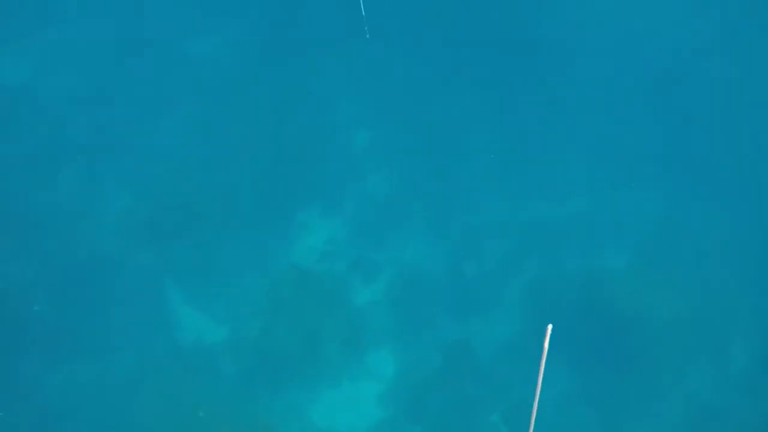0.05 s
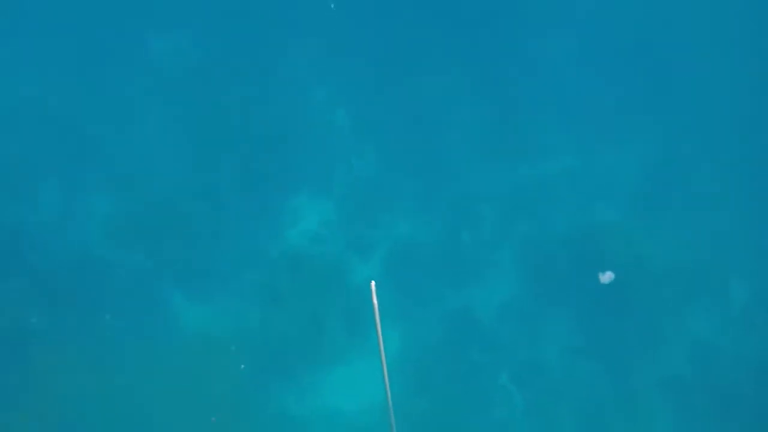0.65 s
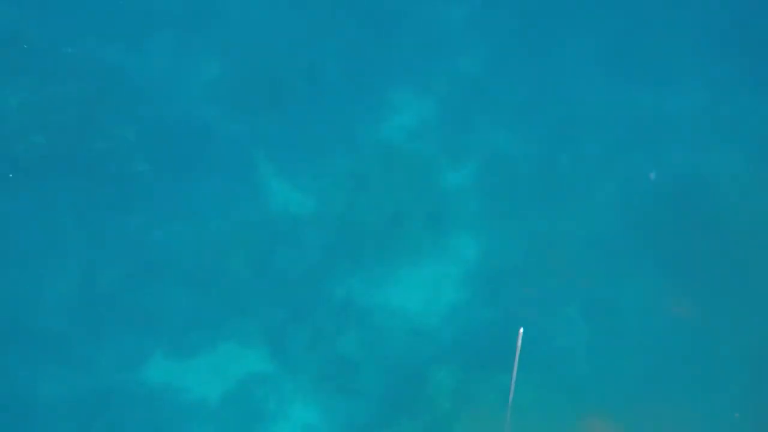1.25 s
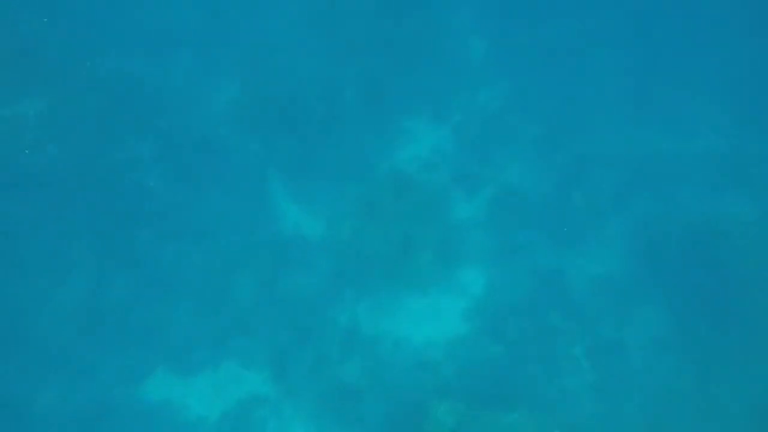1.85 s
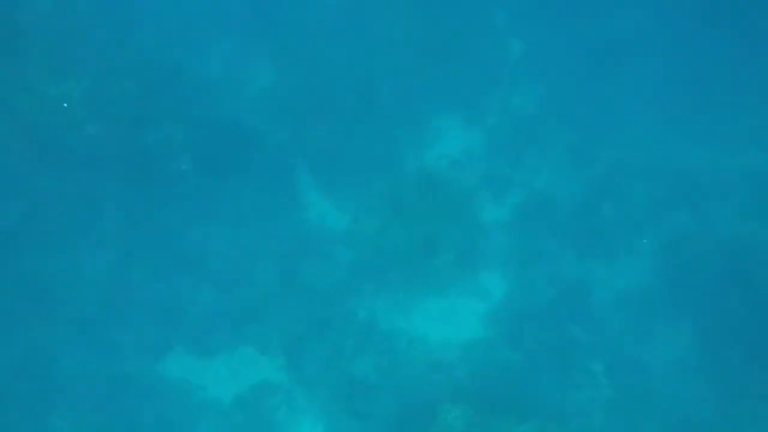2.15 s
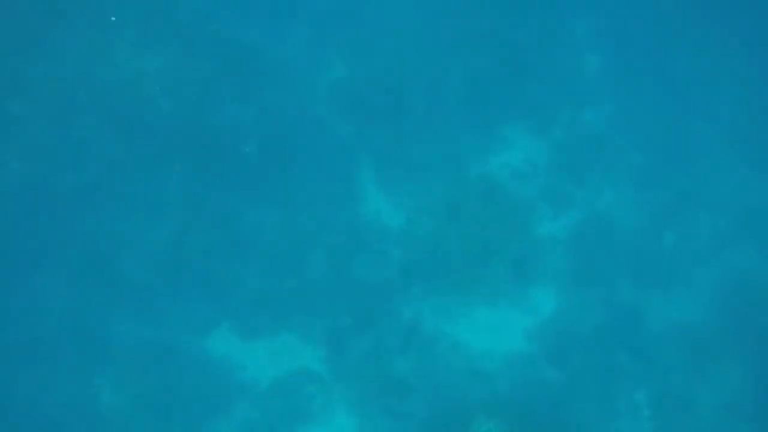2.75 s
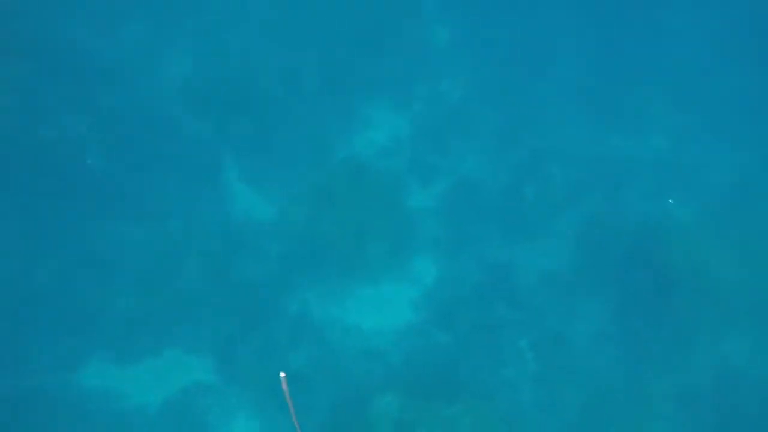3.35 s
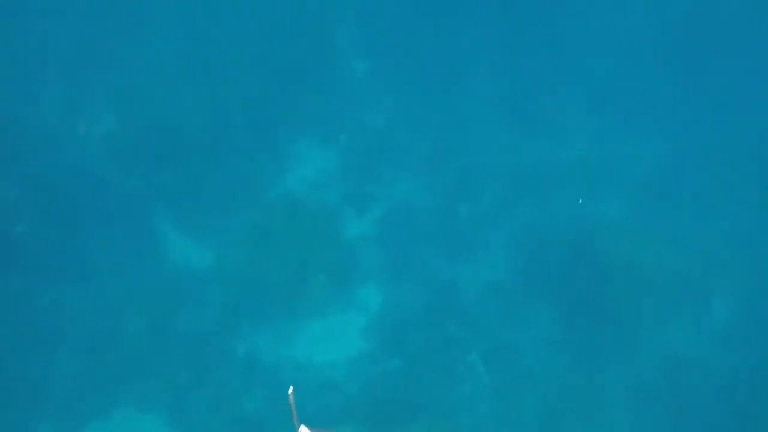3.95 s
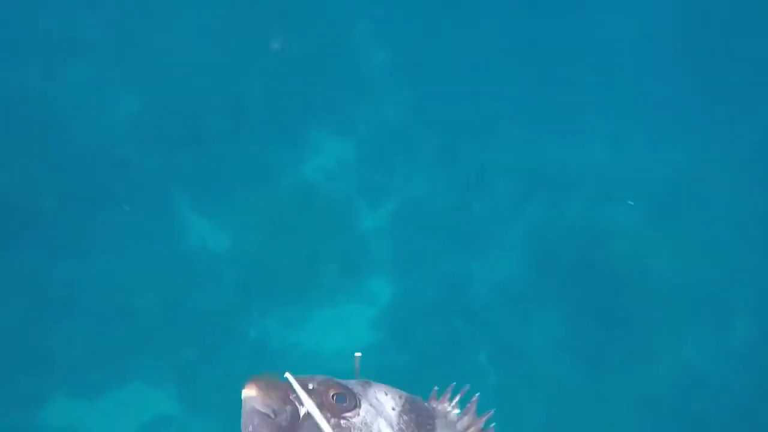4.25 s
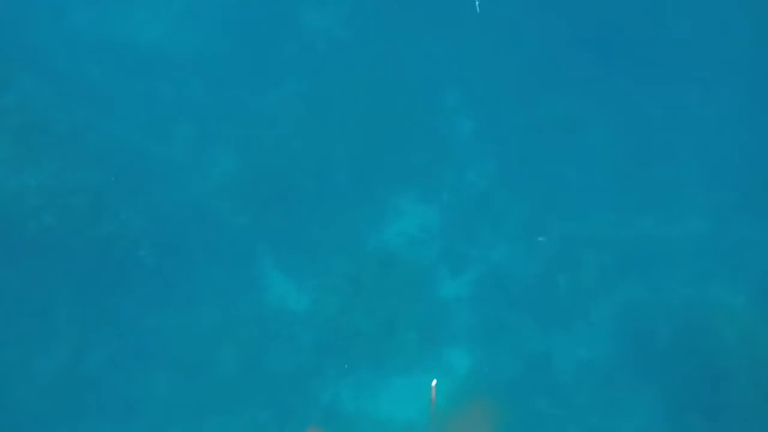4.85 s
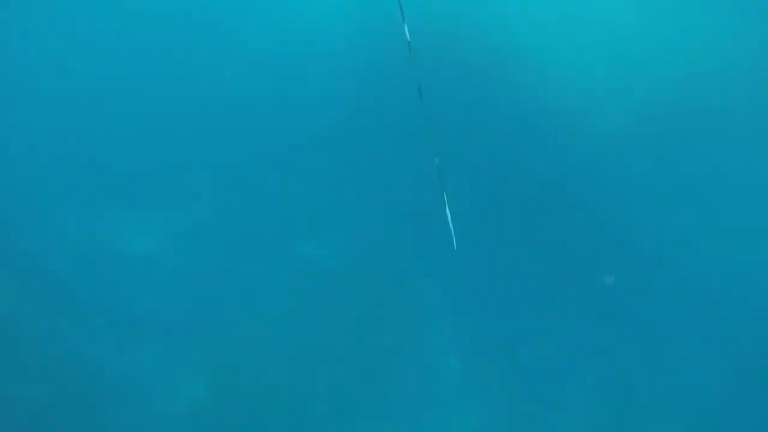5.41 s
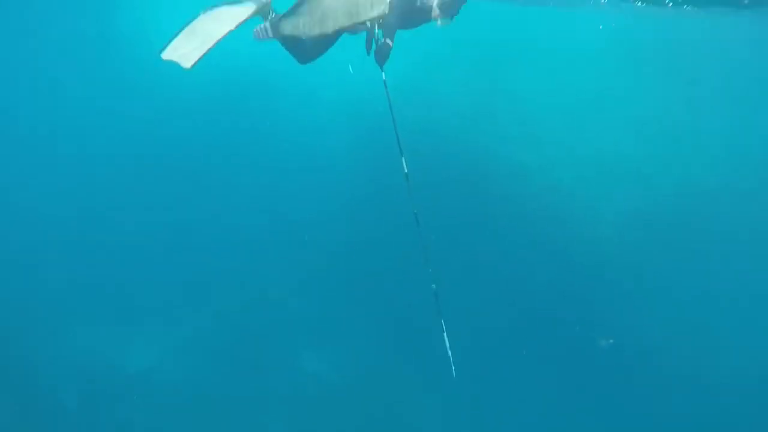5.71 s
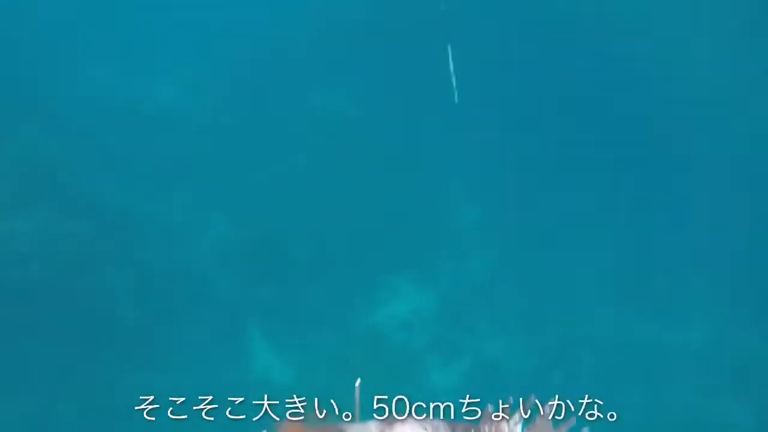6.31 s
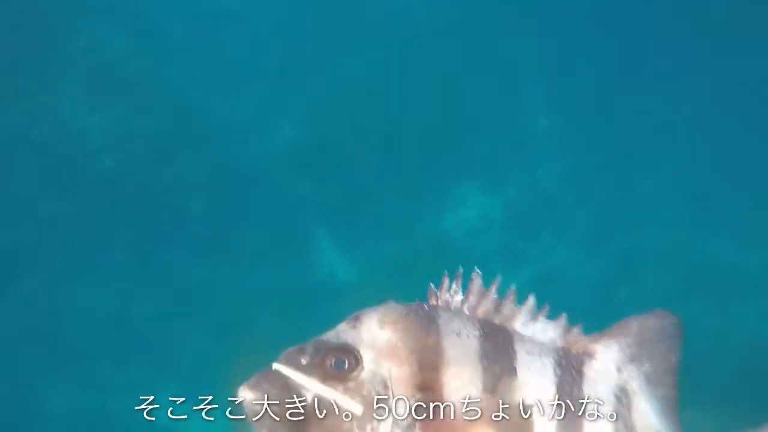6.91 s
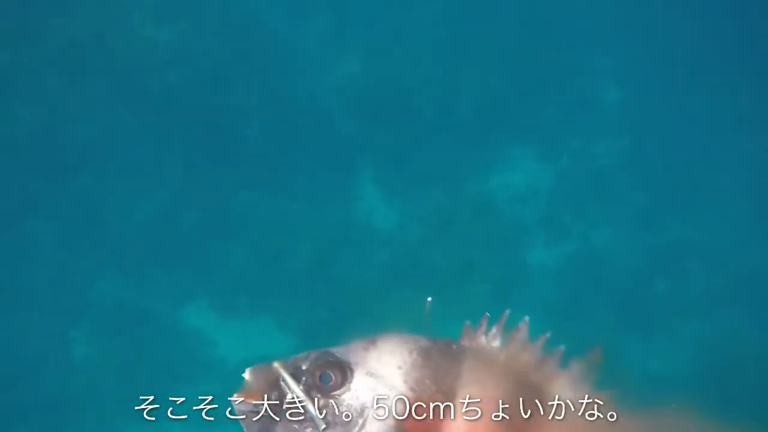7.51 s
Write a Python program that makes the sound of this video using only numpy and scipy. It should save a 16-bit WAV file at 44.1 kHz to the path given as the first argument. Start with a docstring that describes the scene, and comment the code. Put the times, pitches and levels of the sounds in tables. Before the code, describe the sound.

Snapping shrimp fizz and tick throughout this underwater sound, picked up by a housed camera moving through the sea. Eddies make the housing boom, with a few plops and then a thudding swell. From the middle, diving gear rubs in short gritty strokes, with close knocks and ringing bubbles. Near the end come heavier surges, a loud cluster of clacks and plops, and one last scuff as the rumble eases.

```python
"""A diver's camera moves through open sea. From the start, eddies buffet its housing and make it boom,
while snapping shrimp crackle all around. At 0.6 s water plops and bubbles ring; near 2 s comes a surge
with knocks. From 3 s gear rubs over the housing in strokes, among more knocks, bubbles and sharp ticks.
From 5 s stronger surges and gurgling plops lead to the loudest clicks, at 6.1 s, which a limiter holds.
A last stroke scuffs and booms, and after 7 s the water calms while the shrimp crackle on."""
import sys
import numpy as np
from scipy import signal
from scipy.fft import rfft, irfft, next_fast_len
from scipy.io import wavfile
from scipy.ndimage import uniform_filter1d, minimum_filter1d, map_coordinates

SR = 44100
rng = np.random.default_rng(int(sys.argv[2]) if len(sys.argv) > 2 else 0)


def dump(signal):
    """Clip the signal to [-1, 1] and save it as 16-bit WAV at the path in sys.argv[1]."""
    limited = np.clip(np.atleast_2d(signal).T, -1, 1)
    pcm = np.round(limited * 32767).astype(np.int16)
    wavfile.write(sys.argv[1], SR, pcm)


N = 333837

# Levels in the tables are relative: a source may add its own gain.
# slow course of the water's buffeting and of the housing's boom: time_s, level_db
BUFFET_LEVELS = [(0.0, -39.5), (1.1, -37), (1.94, -32), (2.23, -24.5), (2.49, -33.5), (2.78, -37),
                 (3.35, -29.5), (3.8, -28.5), (4.17, -25), (5.74, -31), (6.92, -26.5), (7.12, -32.5),
                 (7.44, -39)]
BOOM_LEVELS = [(0.0, -34), (0.6, -43), (1.28, -37), (1.92, -40.5), (2.15, -31.5), (2.65, -43.5),
               (3.37, -34), (3.98, -38), (4.6, -34.5), (5.27, -50.5), (6.62, -40), (6.77, -28),
               (7.57, -45.5)]
# surges of water as the camera swings: start_s, level_db
SURGES = [(2.07, -31), (4.984, -17.5), (5.601, -22), (6.12, -13.5), (6.63, -24.5)]
# soft shoves against the housing: start_s, level_db, pitch_hz
SHOVES = [(0.553, -21.5, 80), (1.527, -20.5, 171), (2.073, -9.5, 157), (2.092, -13, 54.7),
          (2.155, -10.5, 40.2), (3.369, -20.5, 126), (3.817, -17.5, 42), (4.143, -13.5, 132),
          (4.227, -12.5, 125), (4.261, -11.5, 130), (5.171, -12, 48.2), (5.239, -9, 36.1), (5.611, -17, 91),
          (6.082, -14.5, 99), (6.143, -9, 76), (6.179, -10.5, 124.4), (6.313, -13, 125), (6.632, -13, 132),
          (6.69, -9.5, 133), (6.748, -8.5, 113), (6.799, -11.5, 157), (7.059, -16, 135)]
# knocks on the housing: start_s, thud_db, ring_db
KNOCKS = [(0.572, -32, -14), (2.079, -27, -11.5), (2.099, -28.5, -10), (3.13, -34.5, -15),
          (3.315, -32, -17), (4.23, -29, -17), (4.7135, -17, 3.5), (4.899, -19.5, -7.5), (6.091, -33, 0),
          (6.256, -31.5, -11)]
# modes of the housing: pitch_hz, level_db, t60_s
HOUSING_MODES = [(198.2, -6, 0.15), (317, -12, 0.058)]
# slaps of water: start_s, level_db, start_pitch_hz, gurgle_db
PLOPS = [(0.56, -21.5, 2000, -22.5), (0.573, -14, 905, -26), (0.866, -21, 704, -31),
         (0.888, -16, 2000, -33), (5.016, -19, 1200, -28), (5.241, -17, 1100, -31), (5.985, -21, 2000, -36),
         (6.1429, -1, 2370, -17), (6.364, -21, 1110, -21.5), (6.562, -20.5, 1310, -21.5),
         (7.042, -15.5, 1860, -15.5)]
# short pitched clicks (clacks, the bright tops of snaps, a gurgle's onset): start_s, level_db, centre_hz
CLICKS = [(0.559, -19.5, 7600), (3.887, -22, 11700), (5.3707, -24.5, 11000), (6.089, -13, 3070),
          (6.09, -3.5, 8200), (6.1421, -5.5, 2720), (6.1425, 0.5, 997), (7.049, -19.5, 1280)]
# strokes of gear over the housing: start_s, length_s, scuff_db, grit_db, fizz_db
STROKES = [(2.068, 0.05, -36.5, -29, -36.5), (3.157, 0.35, -47.5, -52, -55.5),
           (3.837, 0.12, -75, -51, -45.5), (4.078, 0.37, -51, -46, -52.5), (4.458, 0.36, -48, -50.5, -50.5),
           (5.422, 0.051, -79, -50, -37.5), (5.798, 0.675, -49.5, -84, -82),
           (6.199, 0.14, -52.5, -41.5, -41.5), (6.609, 0.33, -39.5, -48, -55)]
# catches of sliding gear: start_s, level_db
CATCHES = [(3.368, -26), (3.388, -22), (3.424, -25.5), (3.82, -26.5), (4.087, -28.5), (4.143, -25.5),
           (4.242, -22), (6.089, -11.5), (6.66, -24.5), (6.817, -14), (6.851, -30), (7.108, -27),
           (7.513, -28.5)]
# free bubbles and trapped air pockets: start_s, level_db, pitch_hz, t60_s, glide_octaves_per_s
BUBBLES = [(0.342, -24, 1496, 0.052, -8), (.345, -25.5, 2140, 0.038, -1), (0.536, -26, 1574, 0.048, -11.5),
           (.574, -26, 2520, 0.044, -8), (3.131, -5, 1086, 0.08, 8), (3.316, -25, 572, 0.24, 4.5),
           (4.711, -6, 379, 0.082, -2.5), (4.715, -14, 604, 0.11, 3), (4.716, -12.5, 916, 0.082, 3.5),
           (4.715, -12.5, 2075, 0.03, -0.5), (4.736, -17, 2110, 0.019, 3), (4.9, 6, 942, 0.019, 2),
           (6.257, -15.5, 1560, 0.033, -28), (6.261, -5.5, 1210, 0.048, 12)]
# close snaps and ticks: start_s, level_db, body_offset_db
SNAPS = [(0.0417, -32.5, -36), (0.2514, -33.5, -14), (0.2972, -35, -13), (0.5604, -35, 1),
         (0.6362, -31.5, -33), (0.7225, -25, -18.5), (0.731, -27.5, -16), (0.8453, -28.5, -17.5),
         (0.874, -33.5, -9), (1.085, -27, -11.5), (1.106, -29.5, -11.5), (1.1315, -29, -9),
         (1.47, -23, -22.5), (1.8974, -28, -16), (1.9394, -23, -17), (2.2448, -27.5, -11),
         (2.3, -24, -22.5), (2.4411, -25, -21), (3.374, -25.5, -6.5), (3.46, -20.5, -14),
         (3.501, -24.5, -15), (3.725, -29.5, -26), (3.8362, -18, -14), (3.86, -22, -12), (3.8864, -21, -14),
         (4.0136, -24, -26), (4.103, -31.5, -18), (4.169, -25.5, -13), (4.2205, -30.5, -29),
         (4.2612, -27.5, -16), (4.2993, -32, -23), (4.339, -31, -27), (4.3842, -24, -17),
         (4.4416, -31, -13), (4.4642, -26.5, -15), (4.571, -25, -11), (4.632, -29, -10.5),
         (4.6781, -12, -17.5), (4.692, -24, -13), (4.7451, -25.5, -13), (5.1496, -19, -26),
         (5.204, -28, -31), (5.2293, -19, -15), (5.3027, -24, -39), (5.3684, -16, -20),
         (5.6198, -11, -20.5), (5.624, -13.5, -28), (5.639, -27, -23), (5.6612, -21, -21),
         (5.704, -23, -24), (6.1685, -22.5, -11.5), (6.275, -19, -30), (6.3078, -20, -10), (6.504, -29, -8),
         (6.559, -27, -9.5), (6.6785, -28.5, -13), (6.773, -25, -16), (6.817, -23.5, -27),
         (6.913, -31, -28), (7.206, -27, -19), (7.3433, -28.5, -7), (7.5237, -24, -10)]

# spectra of the sounds as heard inside the housing: frequency_hz, density_db
BUFFET_SPECTRUM = [(10, -6), (22, 2.5), (35, 2.5), (60, -10.5), (100, -13.5), (160, -29.5), (300, -37),
                   (700, -93.5)]
BOOM_SPECTRUM = [(50, -11), (100, -12), (135, -1.5), (162, 2), (200, -9.5), (250, -11.5), (400, -26),
                 (800, -65)]
THUD_SPECTRUM = [(40, -49), (150, 12.5), (260, 9.5), (400, 7), (600, 8.5), (900, -6.5), (1200, -5),
                 (1600, -5), (3000, -30.5), (8000, -99)]
SCUFF_SPECTRUM = [(150, -12), (350, -4), (650, -4), (850, -5.5), (1100, -8.5), (1400, -13.5), (8000, -85)]
GRIT_SPECTRUM = [(900, -25.5), (1320, -11), (1450, 9), (1780, 10.5), (2150, -8), (2500, -5), (3100, -20.5),
                 (3700, -6), (4400, -21), (16000, -42)]
SNAP_SPECTRUM = [(1200, -57), (2600, -5.5), (3500, -21), (4100, -26), (4700, -4), (6100, 7.5), (6550, 1.5),
                 (7000, 12), (7700, -1.5), (8600, -0.5), (9800, -14), (14000, -25), (16000, -34)]
SNAP_BODY_SPECTRUM = [(900, -1), (1350, -4.5), (1600, 9), (1900, 6), (2250, 0.5), (2700, -3.5),
                      (3700, -3.5), (5000, -4.5), (10000, -62)]
FAR_SHRIMP_SPECTRUM = [(1000, 1.5), (2500, 7), (3900, -1), (4700, 2.5), (7050, 5), (9800, -0.5),
                       (12000, -4.5), (16000, -32)]

# phase between the two microphones: frequency_hz, left_lead_rad
MIC_LEAD = [(310, 0.16), (430, 1.63), (620, 2.41), (1350, 2.49), (1550, 5.05), (2450, 8.44), (3900, 6.4),
            (4400, 7.36), (6100, 6.6), (6600, 7.96), (7200, 6.45), (12000, 7.2)]
# likeness of the two microphones: frequency_hz, coherence_ratio
MIC_COHERENCE = [(100, 1), (200, 0.92), (450, 0.2), (900, 1), (1700, 0.25), (2900, 0.15), (7000, 0.3),
                 (12000, 0.033)]
# balance of the two microphones: frequency_hz, left_minus_right_db
MIC_BALANCE = [(200, -1.96), (650, 1), (1100, -0.5), (2400, 3), (5000, -1.5), (7200, -0.5), (8700, -4.5),
               (11000, 0)]


def water(buffet_gain_db=4, boom_gain_db=3, eddy_db=3.4):
    """Turbulent pressure: eddies and surges push on the housing and set its air space booming."""
    buffet_level = amp(over_time(BUFFET_LEVELS) + buffet_gain_db) + surges()
    boom_level = amp(over_time(BOOM_LEVELS) + boom_gain_db)
    eddies = amp(eddy_db * wobble(16))
    buffet = buffet_level * steady(housed(noise(), BUFFET_SPECTRUM), span_s=0.071)
    boom = boom_level * steady(housed(noise(), BOOM_SPECTRUM), span_s=0.061)
    return eddies * (buffet + boom)


def surges(attack_s=0.0091, hold_s=0.015, release_s=0.12):
    """Dynamic pressure grows with flow speed: at each swing the buffeting swells, holds and ebbs."""
    corners = np.cumsum([0, attack_s, hold_s, release_s])
    return sum(amp(db) * np.interp(since(s), corners, [0, 1, 1, 0]) for s, db in SURGES)


def shoves(rise_cycles=0.8):
    """Heavy damping: a soft push swells and dies in a few uneven cycles, the lower the slower."""
    out, t = np.zeros((2, N)), np.arange(SR // 5) / SR
    for s, db, hz in SHOVES:
        rise_s = rise_cycles / hz
        phase = phase_of(hz * (1 + 0.13 * wobble(88.5, len(t))))
        push = amp(db) * t / rise_s * np.exp(1 - t / rise_s) * np.sin(phase)
        add(out, s, push * amp([[-0.7], [0.7]]))  # slightly to the right
    return out


def knocks(sharp_ratio=0.8, settle_s=0.0021):
    """Modal ringing: a blow thuds and excites the housing's modes, which start sharp and drop to pitch."""
    out, t = np.zeros((2, N)), np.arange(SR // 4) / SR
    phase_per_hz = phase_of(1 + sharp_ratio * np.exp(-t / settle_s))
    onset = 1 - np.exp(-t / 0.0058)
    for s, thud_db, ring_db in KNOCKS:
        ring = sum(amp(db - 60 * t / t60) * np.sin(hz * rng.normal(1, 0.0087) * phase_per_hz)
                   for hz, db, t60 in HOUSING_MODES)
        add(out, s, amp(ring_db) * np.tile(ring * onset, (2, 1)))
        add(out, s, amp(thud_db + 14.5) * burst(THUD_SPECTRUM, t60=0.022, tail_db=-19, tail_t60=0.1))
    return out


def plop(start_hz, halving_periods=1.347, t60=0.041):
    """A damped chirp: one rough gulp of water, its pitch plunging unevenly within a few cycles."""
    t = np.arange(SR // 16) / SR
    hz = start_hz / (1 + t * start_hz / halving_periods)
    phase = phase_of(hz * 2 ** (0.4 * wobble(900, len(t))))
    flutter_db = 2.5 * wobble(700, len(t))
    onset = 1 - np.exp(-(t * start_hz) ** 2)
    return amp(flutter_db - 60 * t / t60) * onset * stereo_tone(phase, hz)


def plops(gulps=6, gurgle_s=0.027, gurgle_hz=870):
    """Cavity excitation: water slaps into a gap of the housing, and smaller gulps gurgle after it."""
    out = np.zeros((2, N))
    for s, db, hz, gurgle_db in PLOPS:
        add(out, s, amp(db) * plop(hz))
        for late, pitch, size in rng.random((gulps, 3)):
            gulp = plop(gurgle_hz * 2 ** (2 * pitch - 1))  # within an octave either way
            add(out, s + late * gurgle_s, amp(gurgle_db) * size * (1 - late / 2) * gulp)
    return out


def clicks():
    """Band-limited transients: each short, dry click takes its pitch from one broad spectral peak."""
    out = np.zeros((2, N))
    for s, db, hz in CLICKS:
        hump = [(hz / 2, -20), (hz / 1.2, -6), (hz, 0), (hz * 1.2, -11), (hz * 1.35, -25), (16000, -62)]
        add(out, s, amp(db - 4) * burst(hump, t60=0.012, tail_db=-28, tail_t60=0.03))
    return out


def rubbing(boom_over_scuff_db=15):
    """Stick-slip friction: gear slides in clumps of tiny slips; each stroke also stirs the boom."""
    slips = unit(amp(2.2 * wobble(70)))
    grit_grains = grains(200, spread_db=1)
    scuff = slips * unit(housed(noise() + 0.5 * grains(250, spread_db=-0.5), SCUFF_SPECTRUM))
    grit = slips * unit(housed(0.47 * noise() + grit_grains, GRIT_SPECTRUM))
    fizz = unit(slips * housed(noise() + grains(170, spread_db=-5), SNAP_SPECTRUM))
    boom = amp(boom_over_scuff_db) * steady(housed(noise(), BOOM_SPECTRUM), span_s=0.26)
    out = amp(-48) * scuff + amp(-55.5) * grit  # light contact throughout
    for s, length_s, scuff_db, grit_db, fizz_db in STROKES:
        progress = np.clip(since(s) / length_s, 0, 1)
        arch = np.sqrt(np.abs(np.sin(np.pi * progress)))
        out += arch * (amp(scuff_db) * (scuff + boom) + amp(grit_db) * grit + amp(fizz_db) * fizz)
    return out


def catches():
    """Elastic release: sliding gear catches and lets go, ringing the wall like a large grain of grit."""
    out = np.zeros((2, N))
    for s, db in CATCHES:
        add(out, s, amp(db) * burst(GRIT_SPECTRUM, t60=0.025, tail_db=-42, tail_t60=0.024))
    return out


def bubbles(settle_s=0.03):
    """Bubble resonance: air pulses against the water's mass; the pitch slides and trembles with motion."""
    out, t = np.zeros((2, N)), np.arange(SR // 6) / SR
    for s, db, hz, t60, glide in BUBBLES:
        slide_octaves = glide * settle_s * (1 - np.exp(-t / settle_s))
        tremble_octaves = 0.015 * wobble(300, len(t))
        phase = phase_of(hz * 2 ** (slide_octaves + tremble_octaves))
        flicker_db = 1.3 * wobble(300, len(t))
        envelope = amp(db - 60 * t / t60 + flicker_db) * (1 - np.exp(-t / 0.001))
        add(out, s, envelope * stereo_tone(phase, hz))
    return out


def snaps():
    """Impulse response: a close snap rings the stiff walls with a bright crack and a lower body."""
    out = np.zeros((2, N))
    for s, db, body_db in SNAPS:
        detune = rng.lognormal(0, 0.025)
        spectrum = [(hz * detune, level) for hz, level in SNAP_SPECTRUM]
        crack = burst(spectrum, t60=0.0065, tail_db=-28, tail_t60=0.045)
        body = burst(SNAP_BODY_SPECTRUM, t60=0.023, tail_db=-14.5, tail_t60=0.1)
        add(out, s + 0.001087, amp(db + 2) * crack)
        add(out, s + 0.001103, amp(db + body_db + 10.5) * body)
    return out


def shrimp(far_db=-53.5, near_db=-58.5):
    """Superposition: countless far snaps merge to a fizz; nearer ones come in flurries and lulls."""
    far = unit(housed(noise(), FAR_SHRIMP_SPECTRUM))
    t = np.arange(SR // 60) / SR
    scatter = noise(len(t)) * (amp(-60 * t / 0.004) + 0.1 * amp(-60 * t / 0.023))
    flurries = grains(16, spread_db=1) * amp(2 * wobble(6))
    ticks = signal.fftconvolve(flurries, scatter, axes=1)[:, :N]
    near = unit(housed(ticks, SNAP_SPECTRUM)) + amp(-5.5) * unit(housed(ticks, SNAP_BODY_SPECTRUM))
    return amp(far_db) * far + amp(near_db) * near


def housed(pair, spectrum):
    """Transmission: the microphones move together in the bass, and oppose where the housing flexes."""
    n = pair.shape[1]
    m = 2 * next_fast_len(n // 2 + 2048)
    hz = np.fft.rfftfreq(m, 1 / SR)
    # folding the cepstrum gives a causal, minimum-phase filter
    cepstrum = irfft(np.log(amp(along(spectrum, hz))))
    cepstrum[1:m // 2] *= 2
    cepstrum[m // 2 + 1:] = 0
    angle = np.arccos(np.clip(along(MIC_COHERENCE, hz), 0, 1)) / 2
    mid, side = rfft(pair, m) * np.exp(rfft(cepstrum)) * [np.cos(angle), np.sin(angle)]
    balance = amp(along(MIC_BALANCE, hz) / 2)
    left = (mid + side) * balance
    right = (mid - side) / balance * np.exp(-1j * along(MIC_LEAD, hz))
    return irfft(np.array([left, right]), m)[:, :n]


def burst(spectrum, t60, tail_db, tail_t60, attack_s=0.00063):
    """Exponential decay: one transient of peak about 1, a short crack with a weak scattered tail."""
    t = np.arange(SR // 12) / SR
    decay = amp(-60 * t / t60) + amp(tail_db - 60 * t / tail_t60)
    crack = housed(noise(len(t)) * decay, spectrum) * (1 - np.exp(-t / attack_s))
    return crack / np.abs(crack).max(axis=1).mean()


def grains(per_s, spread_db):
    """Shot noise: tiny impacts of uneven size at random times."""
    size = amp(spread_db * np.minimum(rng.exponential(size=N), 4))
    return unit((rng.random(N) < per_s / SR) * size * noise())


def stereo_tone(phase, hz):
    """Phase difference: a sine that leads at the left microphone."""
    return np.sin([phase, phase - along(MIC_LEAD, hz)])


def steady(x, span_s):
    """Division by the running RMS evens out the level of a noise."""
    power = uniform_filter1d(np.mean(x ** 2, axis=0), int(span_s * SR))
    return x / np.sqrt(np.abs(power) + 1e-12)


def wobble(knots_per_s, size=N):
    """Spline interpolation of random knots gives a smooth curve."""
    knots = rng.standard_normal(int(size * knots_per_s / SR) + 4)
    return map_coordinates(knots, [np.arange(size) * knots_per_s / SR])


def along(points, hz):
    """Interpolation on a logarithmic frequency axis."""
    freqs, values = np.transpose(points)
    return np.interp(np.log(hz + 1), np.log(freqs + 1), values)


def over_time(points):
    """Linear interpolation in time, one value a sample."""
    return np.interp(since(0), *np.transpose(points))


def add(track, s, sound):
    """Superposition of a stereo sound on the track at time s."""
    start = round(s * SR)
    part = track[:, start:start + sound.shape[1]]
    part += sound[:, :part.shape[1]]


def phase_of(hz):
    return 2 * np.pi * np.cumsum(hz) / SR


def since(s):
    return np.arange(N) / SR - s


def noise(size=N):
    return rng.standard_normal((2, size))


def amp(db):
    return 10 ** (np.asarray(db) / 20)


def unit(x):
    return x / np.sqrt(np.mean(x ** 2) + 1e-20)


def scene():
    """Linear superposition: the pressures of all sources add at the two microphones."""
    foreground = water() + shoves() + knocks() + plops() + clicks() + rubbing() + catches()
    return foreground + shrimp() + snaps() + bubbles()


def record(dry):
    """Peak and band limiting: the camera ducks the highest peaks and cuts off the top of the treble."""
    ceiling, hold_s, smooth_s, top_hz = 0.92, 0.012, 0.003, 16300
    needed_gain = ceiling / np.maximum(np.abs(dry).max(axis=0), ceiling)
    held_gain = minimum_filter1d(needed_gain, int(hold_s * SR))
    gain = uniform_filter1d(held_gain, int(smooth_s * SR))
    m = next_fast_len(N + SR // 2)
    passband = np.fft.rfftfreq(m, 1 / SR) < top_hz
    return irfft(rfft(dry * gain, m) * passband, m)[:, :N]


dry = scene()
out = record(dry)
dump(out)
```